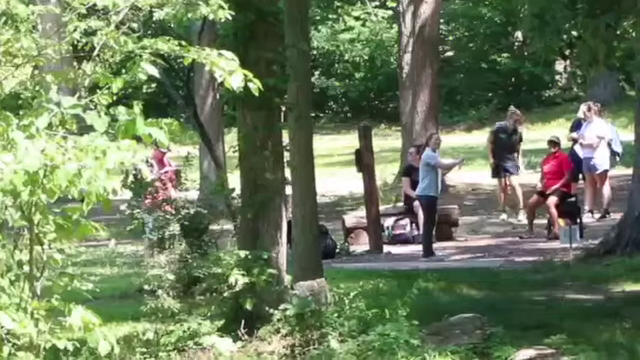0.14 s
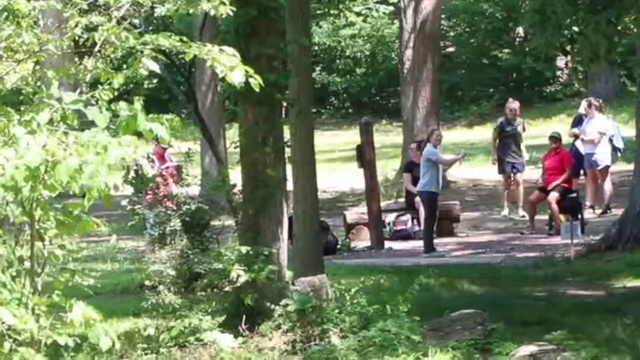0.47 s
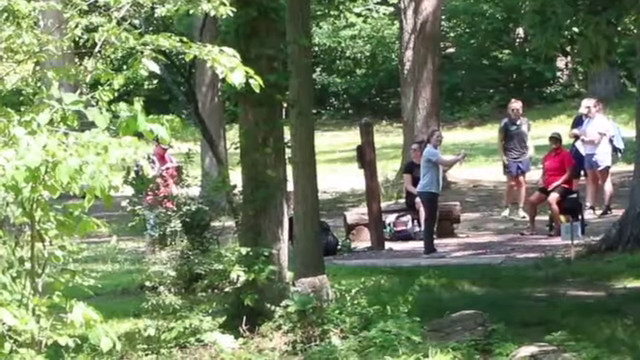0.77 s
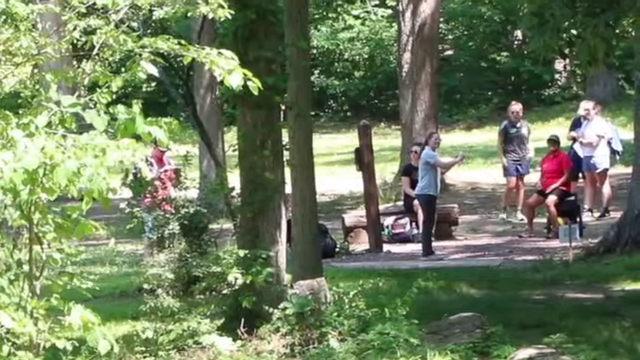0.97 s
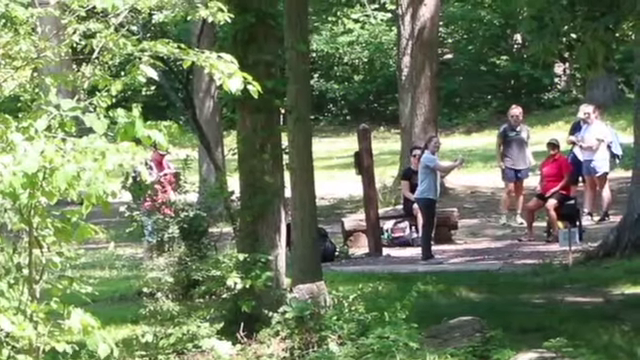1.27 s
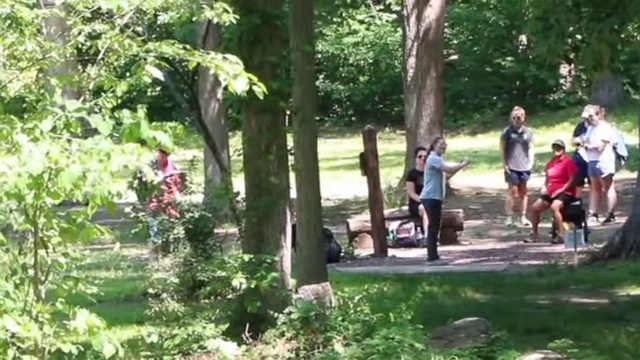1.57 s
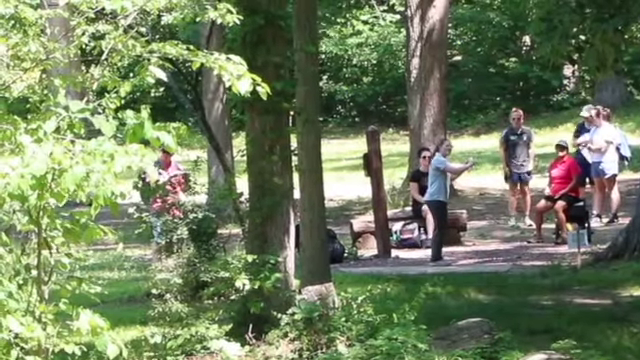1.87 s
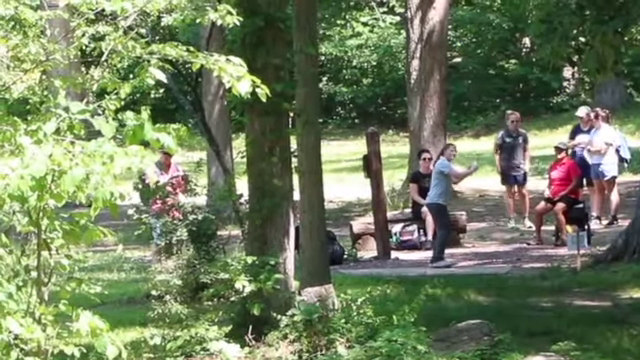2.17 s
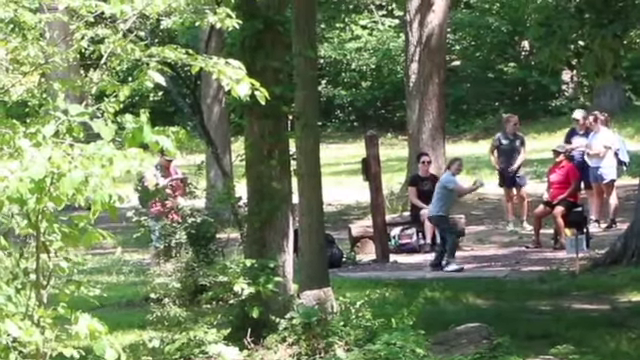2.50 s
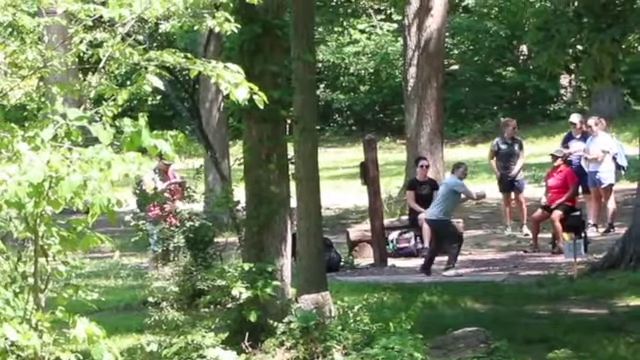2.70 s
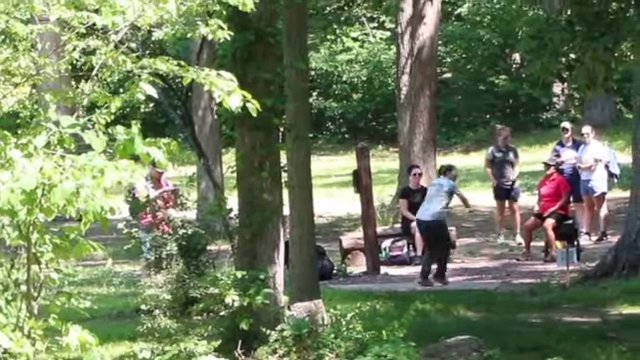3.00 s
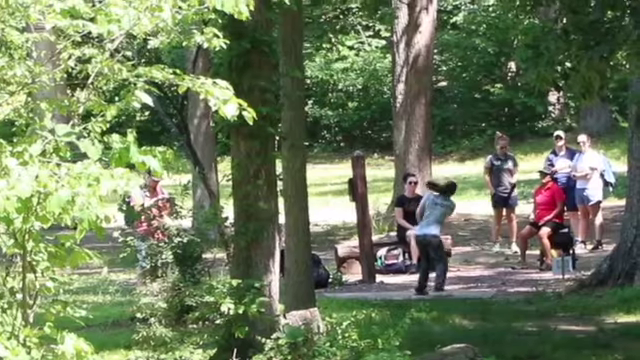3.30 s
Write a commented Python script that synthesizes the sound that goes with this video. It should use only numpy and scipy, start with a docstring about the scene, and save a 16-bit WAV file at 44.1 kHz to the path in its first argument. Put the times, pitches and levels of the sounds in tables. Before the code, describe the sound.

Cicadas fill summer woods with a dense, nearly level drone around 1.3 kHz, plus a quieter, slightly throbbing sizzle at 4-9 kHz, wide on all sides throughout. A faint far bird on the left pipes short gliding notes now and then. A nearer songbird, also left, whistles a rapid sliding phrase from 1.7 to 2.2 seconds and starts again at 3.4, with woodland echo. Distant low rumble and faint hum lie underneath.

```python
"""Summer woods full of cicadas

A vast chorus drones near 1.3 kHz and a second kind sizzles at 4-9 kHz, both built from dense random clicks
through a coloured spectrum. A songbird to the left whistles sliding near-sine phrases that the trees echo;
a farther bird, also left, pipes short gliding notes. Below lie a distant rumble of shaped noise,
a low hum that swells twice, and a faint band of noise that climbs in pitch."""
import sys
import numpy as np
from scipy import signal
from scipy.fft import rfft, irfft, next_fast_len
from scipy.io import wavfile
from scipy.ndimage import uniform_filter1d

SR = 44100
rng = np.random.default_rng(int(sys.argv[2]) if len(sys.argv) > 2 else 0)


def log_audio(samples):
    """Write samples as a 16-bit WAV file to the path given in sys.argv[1]."""
    # one column per channel
    frames = np.atleast_2d(samples).T
    # limit to full scale, then quantise
    limited = np.clip(frames, -1, 1)
    pcm = np.round(limited * 32767).astype(np.int16)
    wavfile.write(sys.argv[1], SR, pcm)


def natural_amplitude(level_db):
    """Convert a level in decibels to a linear amplitude factor, elementwise."""
    exponent = np.asarray(level_db, float) / 20
    return 10 ** exponent


N = 152145  # length in samples


def on_hz(table, hz):
    """Read a (f/Hz, value) table on a log frequency axis."""
    table = np.array(table, float)
    return np.interp(np.log(hz), np.log(table[:, 0]), table[:, 1])


def on_time(table):
    """Read a (t/s, level/dB) table as a gain for every sample."""
    table = np.array(table, float)
    return natural_amplitude(np.interp(np.arange(N) / SR, table[:, 0], table[:, 1]))


def walk(rate):
    """Random levels held 1 / rate seconds, then smoothed twice; spread near 1."""
    hold = int(SR / rate)
    steps = np.repeat(rng.standard_normal(N // hold + 1), hold)
    return 1.12 * uniform_filter1d(uniform_filter1d(steps, hold), hold)[:N]


# likeness (correlation) of left and right across the spectrum: f/Hz, likeness (-1 to 1)
LIKENESS = [(60, .9), (130, .83), (290, .64), (640, .54), (1410, .34), (2300, -.1), (4000, -.04),
            (15000, -.03)]
# left minus right balance across the spectrum: f/Hz, level/dB
LEFT_DB = [(60, 0.5), (110, 0.5), (200, 1.0), (380, 1.6), (700, 1.5), (1290, 1), (2380, 0.03), (4400, 0.35),
           (8120, -1.5), (15000, 0.083)]


def crowd(colour, count, flicker_db, flicker_rate, clicks_per_s=None, scatter_db=0):
    """Countless sources all round: clicks or noise, in count bands that flicker alone; mid rms 1."""
    size = next_fast_len(N)
    hz = np.maximum(np.arange(size // 2 + 1) * SR / size, 1)
    feed = rng.standard_normal((2, size))
    if clicks_per_s:
        clicks = rng.random((2, size)) < clicks_per_s / SR
        strength = natural_amplitude(scatter_db * rng.standard_normal((2, size)))
        feed = np.sign(feed) * clicks * strength
    mid, side = rfft(feed)

    # the mid/side balance sets the width, a tilt sets the lean to one side
    alike = np.clip(on_hz(LIKENESS, hz), -.99, .99)
    mid = mid * np.sqrt(1 + alike)
    side = side * np.sqrt(1 - alike)
    lean = natural_amplitude(on_hz(LEFT_DB, hz) / 2)
    pair = np.array([(mid + side) * lean, (mid - side) / lean]) * natural_amplitude(on_hz(colour, hz))

    # overlapping triangular bands on a log axis
    centres = np.geomspace(colour[1][0], colour[-2][0], count)
    place = np.interp(np.log(hz), np.log(centres), np.arange(count))
    out = np.zeros((2, N))
    for k in range(count):
        band = irfft(pair * np.clip(1 - abs(place - k), 0, 1), size)[:, :N]
        out += band * natural_amplitude(flicker_db * walk(flicker_rate))
    return out / np.sqrt(np.mean(out.mean(axis=0) ** 2))


def whistle(s, hz, db):
    """A near-sine note along times, pitches and rms levels, with soft edges."""
    edge_s = .003
    t = np.arange(N) / SR
    edge = np.clip(np.minimum(t - s[0], s[-1] - t) / edge_s + .5, 0, 1)
    pitch = uniform_filter1d(np.interp(t, s, hz), size=150)  # rounds the corners of the slide
    tone = np.sin(2 * np.pi * np.cumsum(pitch) / SR)
    return np.sqrt(2) * edge * natural_amplitude(np.interp(t, s, db)) * tone


def in_woods(voice, pan_db, echo_db):
    """Place a voice to the left, with one near trunk's echo and diffuse scatter of trunks and leaves."""
    t60_s, far_side_lag_s = .4, .00018
    trunk_s, trunk_db = .005, -13
    t = np.arange(int(t60_s * SR)) / SR
    build_up = np.minimum(t / .015, 1)  # the scatter takes 15 ms to gather
    tail = rng.standard_normal((2, len(t))) * natural_amplitude(-60 * t / t60_s) * build_up
    tail = tail / np.sqrt((tail ** 2).sum(axis=1, keepdims=True))
    trunk_echo = natural_amplitude(trunk_db) * np.pad(voice, (round(trunk_s * SR), 0))[:N]
    left = voice + trunk_echo
    right = natural_amplitude(-pan_db) * np.roll(left, round(far_side_lag_s * SR))  # weaker and later
    scatter = signal.fftconvolve(left[None], tail, axes=1)[:, :N]
    return np.array([left, right]) + natural_amplitude(echo_db) * scatter


# colour of the drone chorus: f/Hz, relative level/dB per Hz
DRONE = [(400, -71), (680, -37.5), (731, -34.5), (833, -19), (976, -21), (1075, -17.5), (1150, -7.5),
         (1200, -7.5), (1280, 0), (1318, 2.5), (1375, -2), (1440, -10.5), (1510, -13.5), (1590, -20.5),
         (1640, -20.5), (1790, -28.5), (2000, -34), (2600, -42.5), (4400, -120)]
# loudness of the drone chorus: t/s, level/dB
DRONE_LEVEL = [(0, -24.5), (.6, -24.5), (1.1, -24.5), (1.6, -24.5), (2.0, -25), (2.45, -24), (2.85, -25),
               (3.3, -24.5), (3.45, -25)]


def drone():
    """Thousands of tymbals buckle at random and ring their abdomens."""
    chorus = crowd(DRONE, count=10, flicker_db=.15, flicker_rate=3, clicks_per_s=30000, scatter_db=1)
    return on_time(DRONE_LEVEL) * chorus


# colour of the sizzle chorus: f/Hz, relative level/dB per Hz
SIZZLE = [(1400, -27), (1900, -8), (2170, -6.5), (2680, -5.5), (3000, -10), (3250, -11.5), (3600, -7),
          (3950, -3.5), (5230, -3.5), (6180, 0), (6930, -3.5), (8120, 1.5), (8800, -3.5), (9860, -11),
          (11500, -21), (13000, -27), (15000, -28), (16500, -34)]
# loudness of the sizzle chorus, before its throb: t/s, level/dB
SIZZLE_LEVEL = [(0.0, -38.5), (0.45, -38), (0.88, -39), (3.41, -39), (3.45, -40.5)]


def sizzle():
    """The higher, ticking kind of cicada, merged into a hiss that throbs a little."""
    shared = .25 * walk(24)
    each_side = .2 * np.array([walk(24), walk(24)])
    throb = natural_amplitude(shared + each_side)
    hiss = crowd(SIZZLE, count=9, flicker_db=1.25, flicker_rate=36, clicks_per_s=20000, scatter_db=2)
    return throb * on_time(SIZZLE_LEVEL) * hiss


# the near bird's phrases, one table a note: t/s, f/Hz, level/dB before flutter
SONG = [
    [(1.699, 4600, -44), (1.705, 3800, -40), (1.716, 3050, -44), (1.728, 2850, -43), (1.740, 3100, -42),
     (1.751, 3800, -37), (1.762, 3980, -47), (1.81, 4000, -50)],
    [(1.830, 5000, -43), (1.837, 4000, -41), (1.845, 3550, -34), (1.853, 3900, -44)],
    [(1.858, 3900, -44), (1.868, 3050, -41), (1.877, 2850, -41), (1.884, 3300, -39), (1.890, 3800, -38),
     (1.904, 4150, -43)],
    [(1.972, 2680, -41), (1.990, 2620, -40), (2.002, 2480, -36), (2.012, 2230, -41)],
    [(2.016, 2350, -41), (2.036, 3100, -31), (2.047, 3350, -35), (2.057, 3700, -32), (2.063, 4150, -45)],
    [(2.064, 3550, -43), (2.071, 3050, -34), (2.083, 2550, -37), (2.092, 2300, -41), (2.115, 2430, -35),
     (2.123, 2500, -42), (2.135, 2560, -38), (2.156, 2450, -47)],
    [(2.166, 2500, -40), (2.184, 2470, -40)],
    [(2.19, 2480, -39), (2.204, 2500, -39)],
    [(2.214, 2430, -45), (2.223, 2520, -45)],
    [(3.386, 4900, -44), (3.394, 3950, -35), (3.402, 3300, -33), (3.413, 2730, -37), (3.425, 3150, -31),
     (3.438, 3650, -31), (3.449, 4350, -36)],
]


def songbird():
    """Sliding near-sine whistles from the left, their level fluttering at random."""
    notes = sum(whistle(*np.array(note, float).T) for note in SONG)
    flutter = natural_amplitude(1.3 * walk(110))
    return in_woods(notes * flutter, pan_db=18, echo_db=-8.5)


# the far bird's notes: start t/s, length t/s, from f/Hz, to f/Hz, mid-note level/dB
PIPES = [(.035, .055, 3200, 2950, -50), (.475, .115, 2130, 2310, -48), (.77, .05, 2650, 2720, -48.5),
         (.85, .055, 3250, 2950, -49.5), (1.24, .02, 2350, 2050, -48), (1.355, .14, 2080, 2270, -47),
         (1.81, .025, 3250, 3150, -46), (1.835, .035, 2950, 2920, -46), (1.880, .017, 2350, 2150, -42),
         (2.885, .015, 2300, 2400, -48), (2.902, .013, 2740, 2760, -46), (3.073, .017, 2230, 2420, -45),
         (3.092, .013, 2760, 2800, -47), (3.263, .02, 2320, 2400, -41), (3.284, .016, 2800, 2830, -40),
         (3.215, .06, 2030, 2000, -51), (3.393, .03, 2100, 1950, -46)]


def piper():
    """Short notes that glide fast at first, then ease toward their end pitch."""
    settle = .5  # time constant of the glide, as a share of the note
    u = np.linspace(0, 1, num=9)
    glide = (1 - np.exp(-u / settle)) / (1 - np.exp(-1 / settle))
    arch_db = -4.2 * (u - .5) ** 2  # each note is loudest in its middle
    notes = np.zeros(N)
    for start, length, from_hz, to_hz, db in PIPES:
        notes += whistle(start + u * length, from_hz + (to_hz - from_hz) * glide, db + arch_db)
    return in_woods(notes, pan_db=12, echo_db=-10)


# colour of the distant rumble: f/Hz, relative level/dB per Hz
RUMBLE = [(12, -37), (20, -3), (43, -7.5), (70, 1), (84, 4), (98, 0.5), (114, 1.5), (256, -4.5), (325, -6),
          (361, -4.5), (401, -7.5), (558, -7), (720, -9.5), (940, -14), (1580, -120)]


def rumble():
    """Far traffic and air: noise shaped to a low, steady bed."""
    level_db = -51
    return natural_amplitude(level_db) * crowd(RUMBLE, count=7, flicker_db=.5, flicker_rate=3)


# colour of the low hum: f/Hz, relative level/dB per Hz
SWELL = [(140, -10), (180, -15), (220, 13.5), (280, -19)]
# its two swells: t/s, level/dB
SWELL_LEVEL = [(.8, -67), (1.08, -54.5), (1.35, -67), (1.6, -56), (1.85, -80)]


def swell():
    """A hum of noise peaking near 220 Hz that swells twice, briefly."""
    return on_time(SWELL_LEVEL) * crowd(SWELL, count=2, flicker_db=1.5, flicker_rate=5)


# a faint climbing band, perhaps a far aircraft: t/s, centre f/Hz, level/dB
CLIMB = [(0, 148.6, -67), (0.602, 198.7, -60), (.9, 270, -61.5), (1.1, 340, -56), (1.35, 373, -54.5),
         (1.6, 407.3, -57.5), (2.0, 524.3, -67), (2.601, 618, -63), (3.45, 640, -76)]


def climb():
    """Slow noise carried on a rising centre frequency."""
    width_hz, side_share = 85, .36
    s, hz, db = np.array(CLIMB, float).T
    t = np.arange(N) / SR
    carrier = np.exp(2j * np.pi * np.cumsum(np.interp(t, s, hz)) / SR)
    lowpass = signal.butter(2, width_hz / 2, fs=SR)
    slow = signal.lfilter(*lowpass, rng.standard_normal((4, N)))
    mid = ((slow[0] + 1j * slow[2]) * carrier).real
    side = ((slow[1] + 1j * slow[3]) * carrier).real
    pair = mid + side_share * side * np.array([[1], [-1]])
    return natural_amplitude(np.interp(t, s, db)) * pair / mid.std()


def scene():
    """All voices of the woods, from the choruses down to the background."""
    return drone() + sizzle() + songbird() + piper() + rumble() + swell() + climb()


def low_pass(x):
    """Removes everything above the highest recorded frequency."""
    return signal.sosfilt(signal.butter(12, 15740, fs=SR, output="sos"), x)


def record(dry):
    """Deliver the finished mix."""
    return low_pass(dry)


dry = scene()
out = record(dry)
log_audio(out)
```